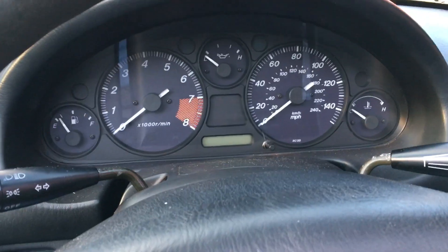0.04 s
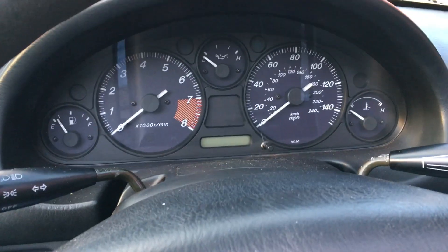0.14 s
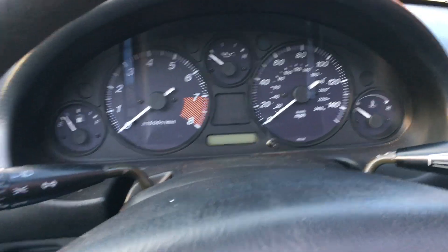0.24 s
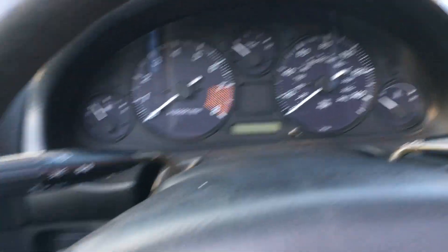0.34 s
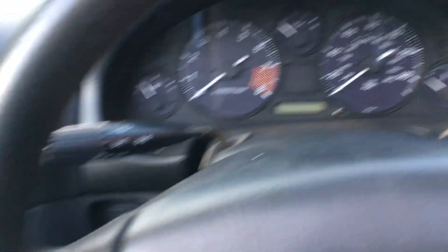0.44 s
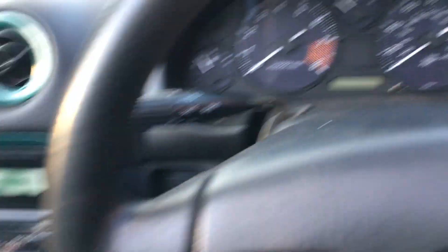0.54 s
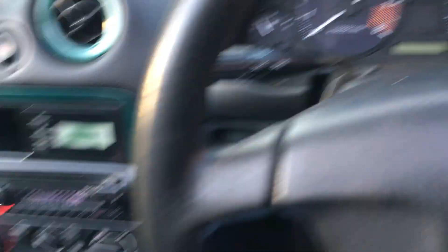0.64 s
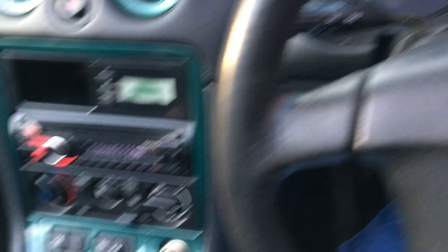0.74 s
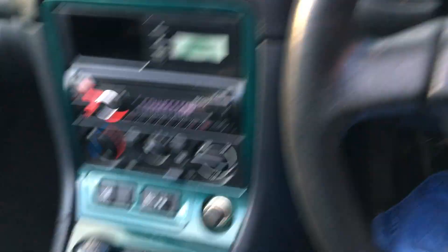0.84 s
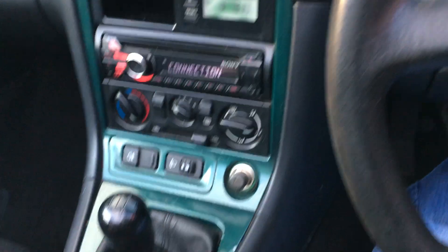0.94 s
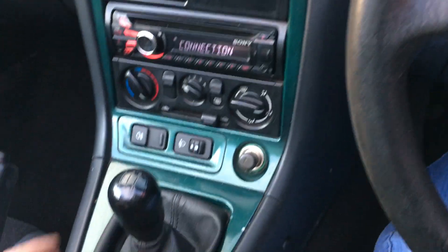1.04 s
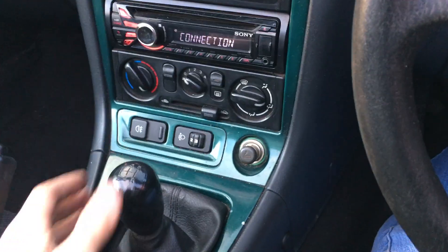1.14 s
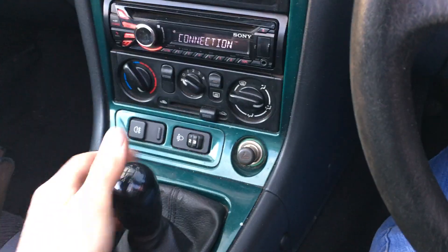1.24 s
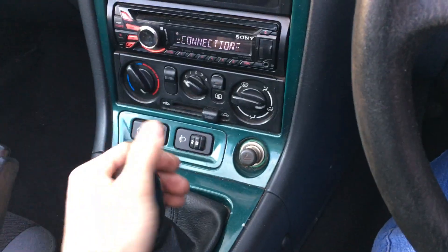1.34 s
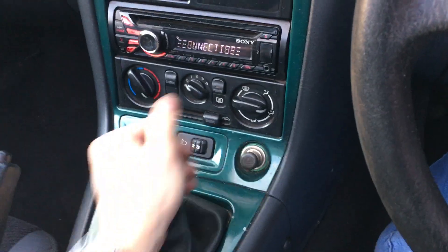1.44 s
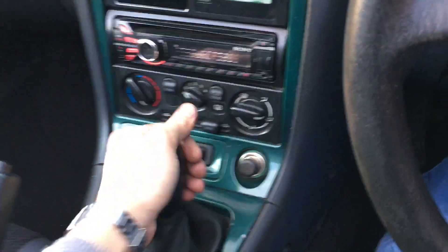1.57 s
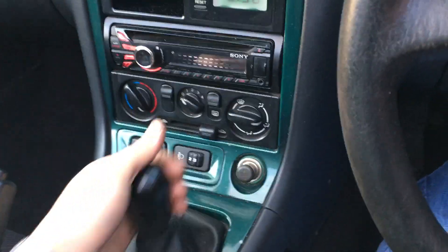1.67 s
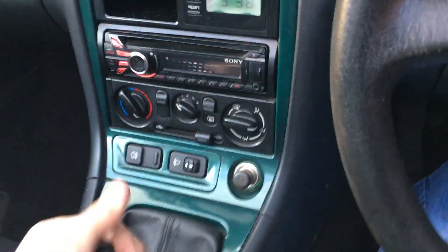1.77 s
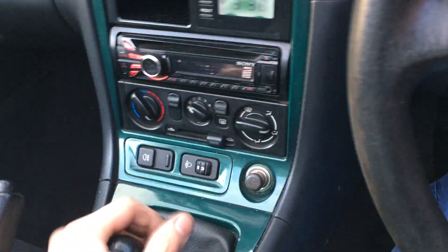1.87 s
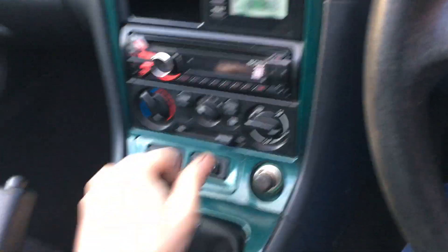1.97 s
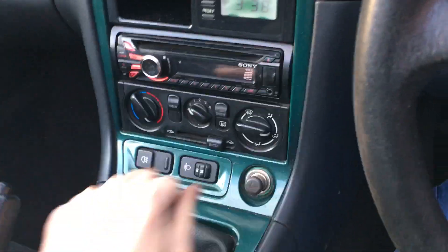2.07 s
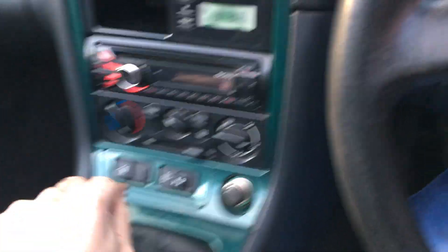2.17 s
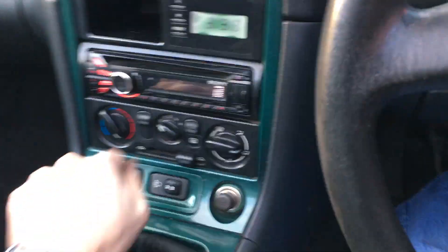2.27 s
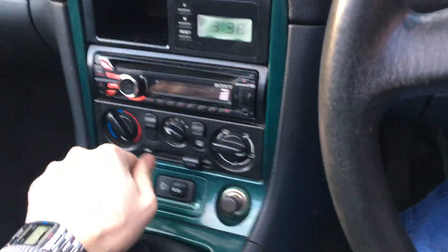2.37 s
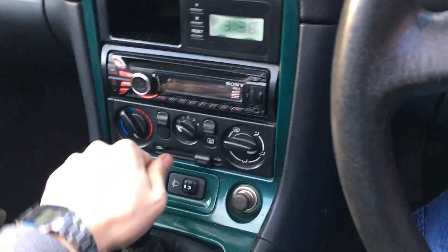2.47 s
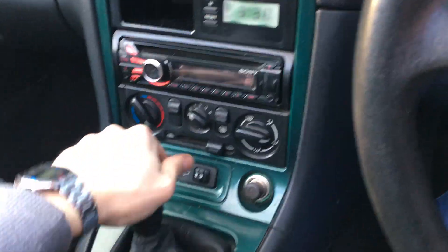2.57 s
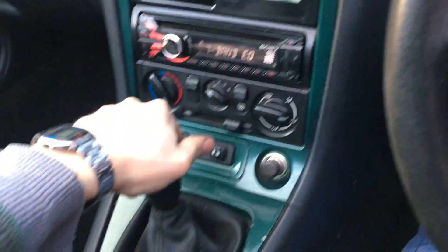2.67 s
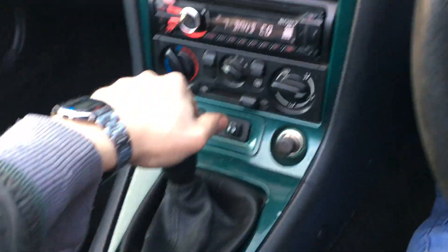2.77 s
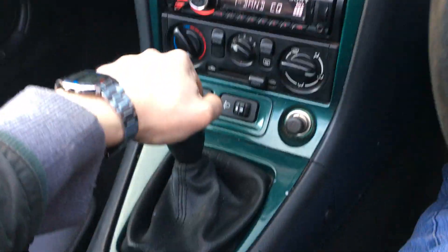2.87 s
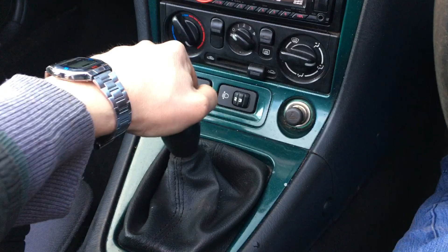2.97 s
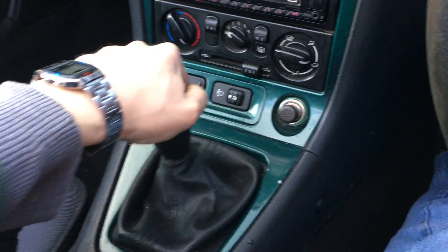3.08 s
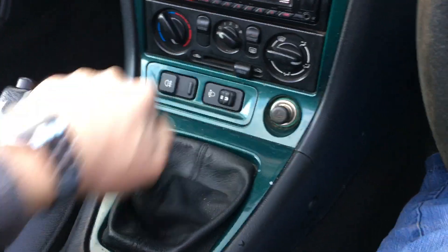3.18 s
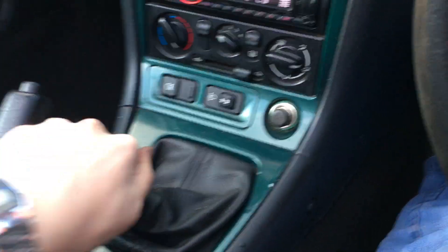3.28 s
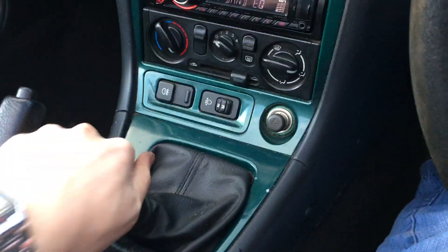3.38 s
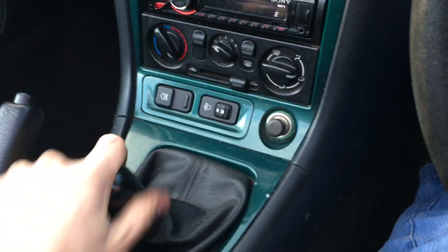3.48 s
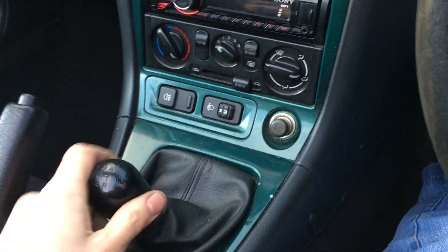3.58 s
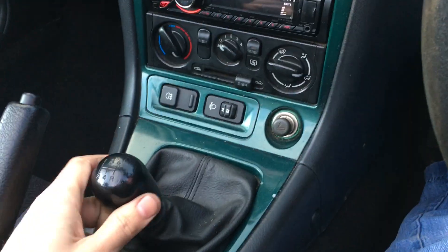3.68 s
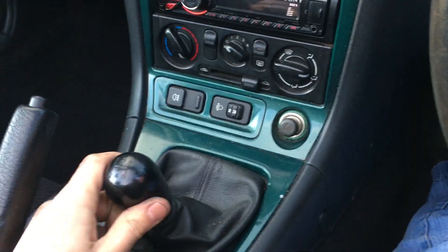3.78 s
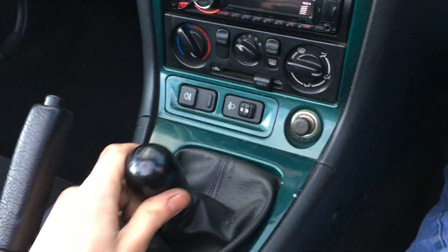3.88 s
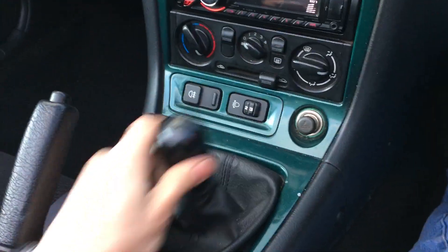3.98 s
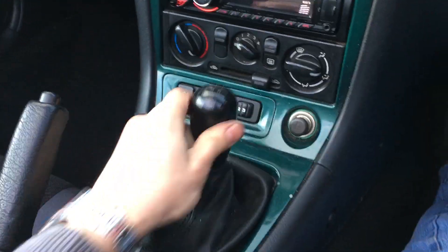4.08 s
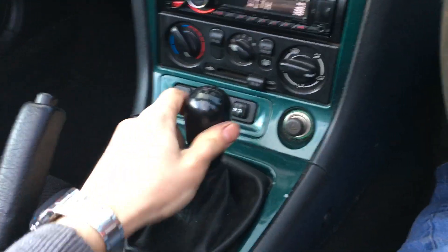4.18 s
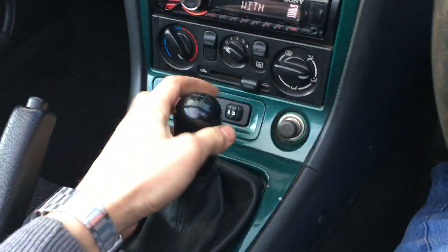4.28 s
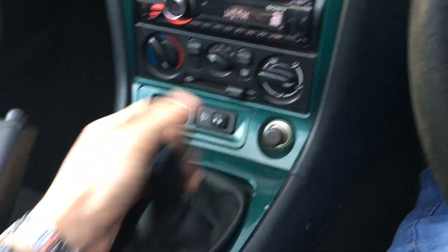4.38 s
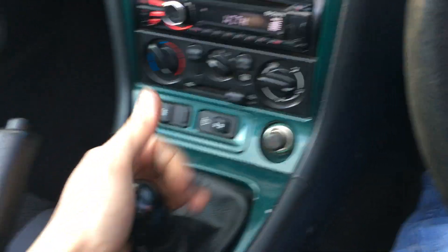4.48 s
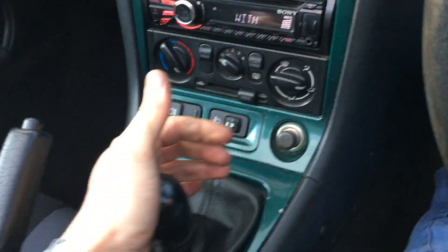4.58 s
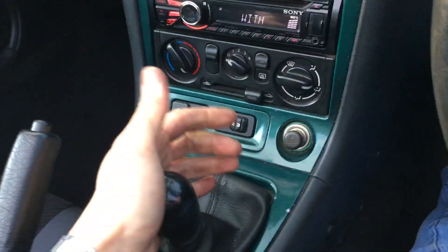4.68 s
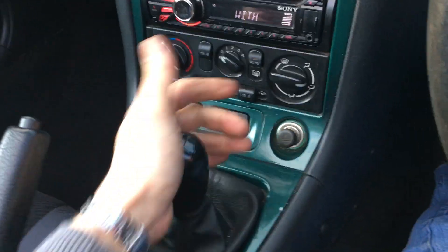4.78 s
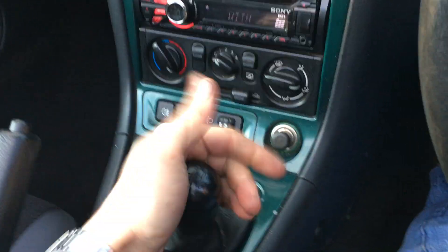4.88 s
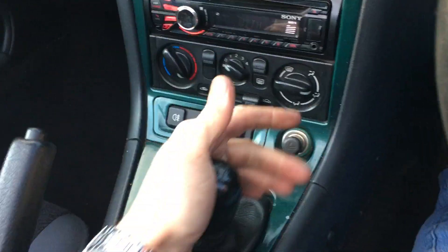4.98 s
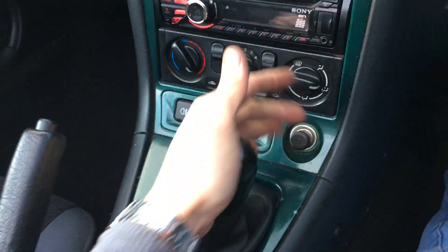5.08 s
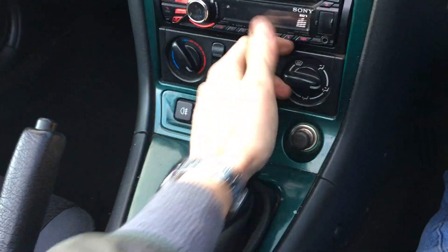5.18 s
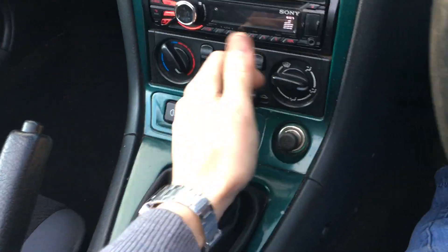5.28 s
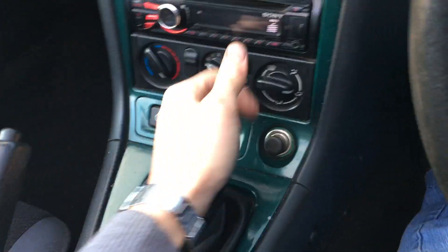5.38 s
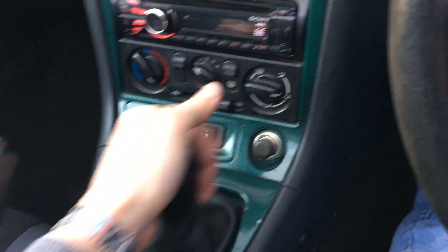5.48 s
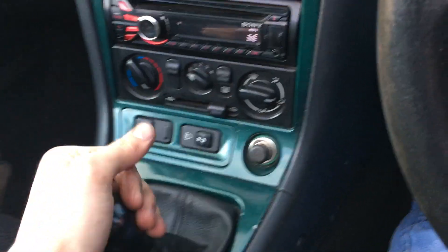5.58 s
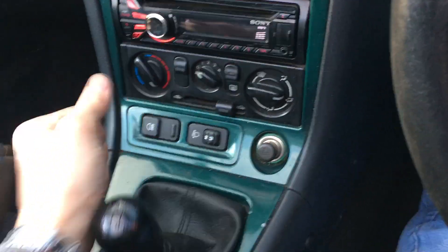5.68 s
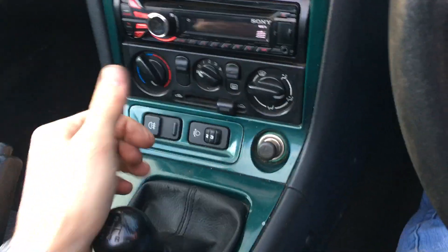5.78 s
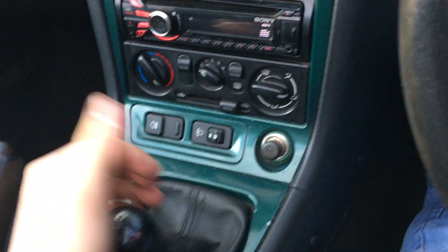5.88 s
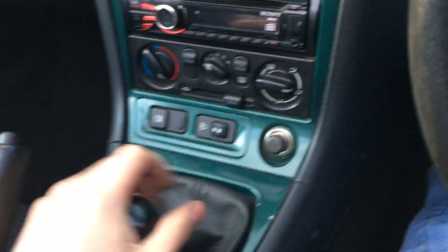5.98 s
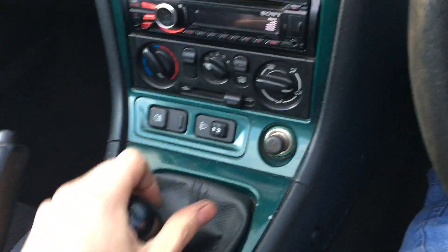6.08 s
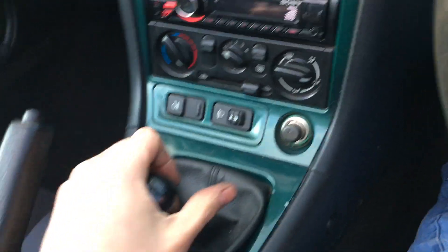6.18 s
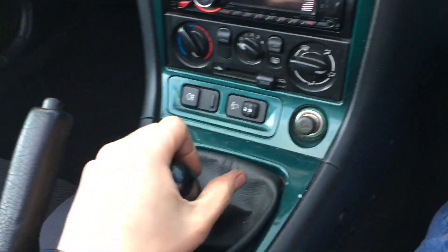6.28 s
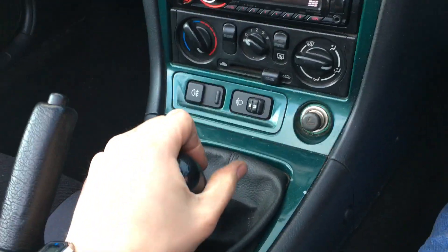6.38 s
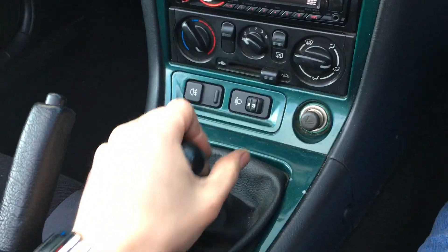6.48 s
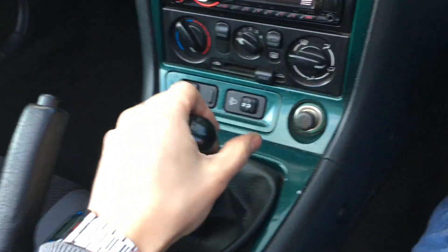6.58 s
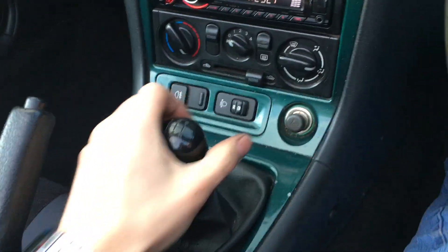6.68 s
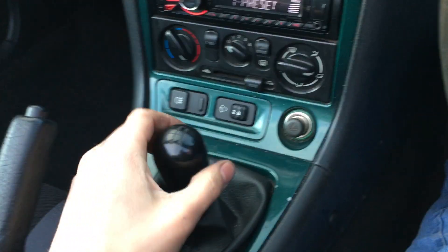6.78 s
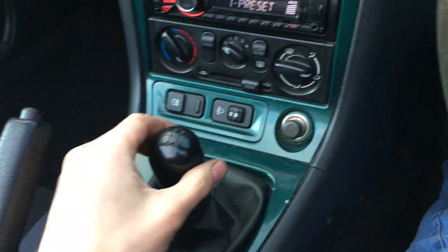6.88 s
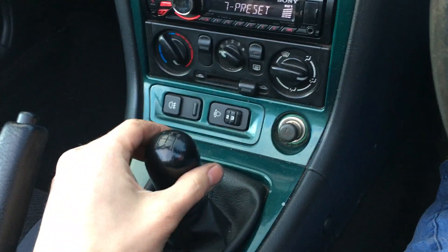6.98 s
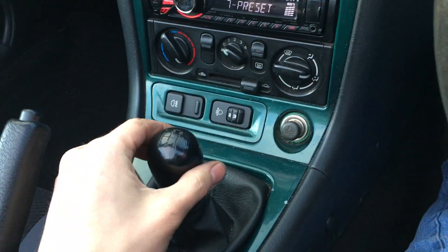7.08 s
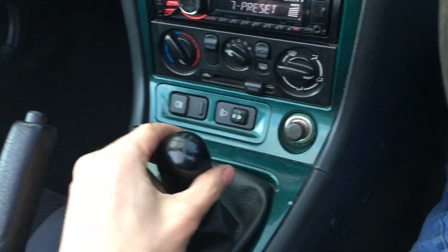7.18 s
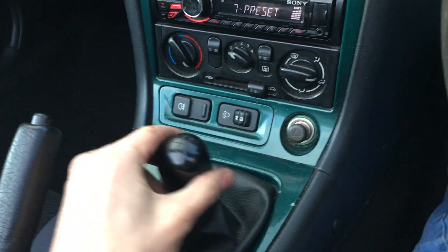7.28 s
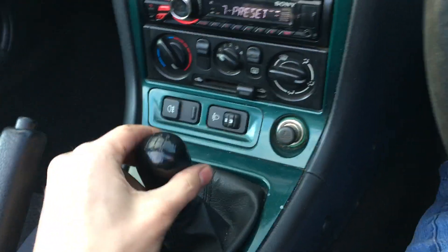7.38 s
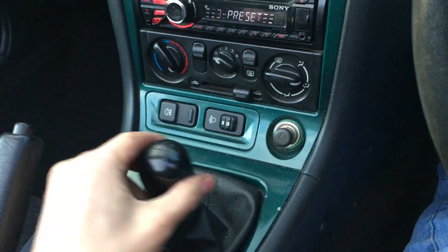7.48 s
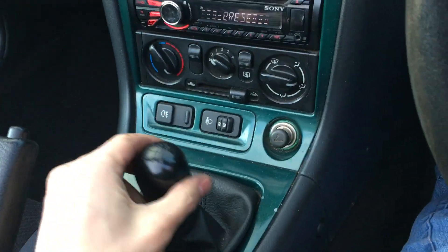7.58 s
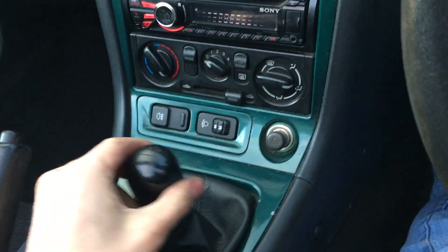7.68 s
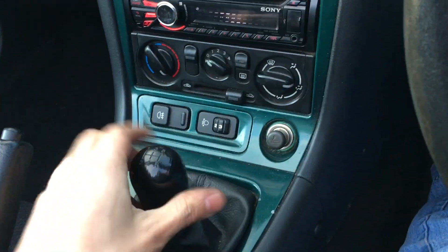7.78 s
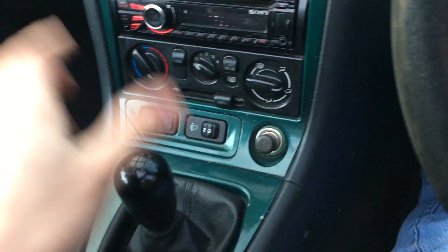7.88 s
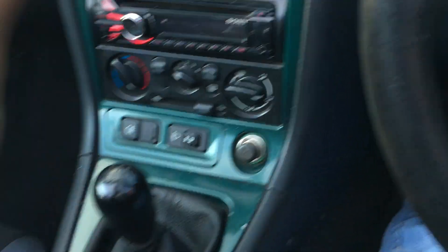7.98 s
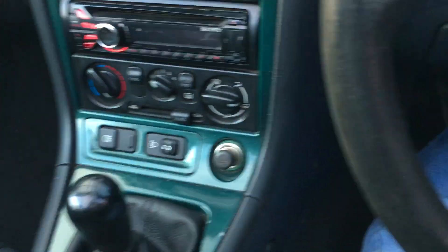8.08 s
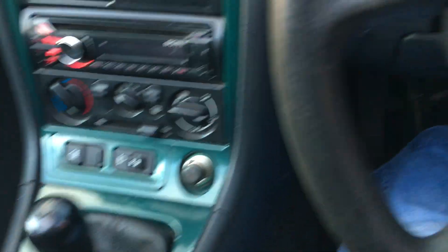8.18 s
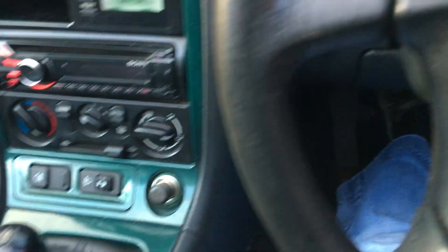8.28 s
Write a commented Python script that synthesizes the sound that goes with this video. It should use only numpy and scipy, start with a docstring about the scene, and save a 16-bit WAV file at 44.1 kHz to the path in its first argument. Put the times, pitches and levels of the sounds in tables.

```python
"""A hand works the manual gear lever of a small parked car, engine off, close to a mono microphone.
The lever knocks into its gates and shakes console and cabin, all built from dying sine modes.
Its linkage clicks (coloured noise snaps) and tinks (rod modes); a steel watch strap jingles (chains of
short modes). Sleeve and leather gaiter rustle as coloured friction noise, over a low outdoor rumble."""
import sys
import numpy as np
from scipy import signal
from scipy.io import wavfile
from scipy.ndimage import uniform_filter1d

SR = 44100
rng = np.random.default_rng(int(sys.argv[2]) if len(sys.argv) > 2 else 0)


def transcribe(signal):
    """Save signal, clipped to [-1, 1], as a 16-bit WAV file at the path in sys.argv[1]."""
    frames = np.atleast_2d(signal).T
    limited = np.clip(frames, -1, 1)
    pcm = np.round(limited * 32767).astype(np.int16)
    wavfile.write(sys.argv[1], SR, pcm)


N = 367747


# The lever meets a gate or stop. Each row: start in seconds, cabin boom in dB, console thud in dB,
# gate knock in dB (all before trims), tilt of the thud in dB per octave (higher is a harder blow).
CLUNKS = [(1.311, -62, -56, -60, 11), (1.529, -37, -39, -55, -9), (1.55, -33.5, -40, -53, -10),
          (1.569, -61, -50, -55, -1), (1.79, -40, -42, -50, 0), (1.829, -48, -44.5, -56, 8),
          (1.855, -41.5, -43.5, -60, 3), (2.036, -40, -34.5, -38, 7), (2.215, -47, -36.5, -60, -10),
          (2.246, -42, -40.5, -63, -7), (2.366, -43, -34.5, -46.5, -2.5), (2.97, -64, -59, -67, 8),
          (3.221, -55, -47, -51, 1), (3.268, -55, -42, -57, 15), (3.28, -41.5, -34.5, -40, 6.5),
          (4.044, -43, -40.5, -49.5, 7), (4.142, -40.5, -41, -61, 6), (4.178, -44, -49, -68, 1),
          (4.469, -37, -39, -52, -0.5), (4.497, -43, -43.5, -67, 4), (4.837, -45, -39, -47.5, -1),
          (4.943, -42.5, -45, -53, -7), (4.986, -68, -44.5, -65, 14), (5.209, -38, -36.5, -46, 5),
          (5.234, -34, -29, -46, 0), (5.265, -42, -42.5, -60, -3), (5.568, -49, -47, -62, 2),
          (5.612, -51, -47.5, -58, 3), (5.75, -44, -36.5, -58, -6), (5.801, -47, -41.5, -59, -5),
          (6.135, -56, -51.5, -73, -9), (6.62, -51, -45, -54.5, 14), (7.847, -49, -52, -64, 3.5),
          (8.059, -47, -52, -62, 16)]
# Resonances of the cabin air, console panels and gate, before each blow's random shift.
# Each row: frequency in Hz, relative level in dB, time to fall 60 dB in seconds.
CABIN = [(55.14, -14.5, 0.53), (69.5, -11.5, 0.28)]
PANELS = [(106, -10, 0.28), (156.5, 1, 0.12), (185, 3.5, 0.13), (204.2, -8.5, 0.32), (262, 2, 0.072),
          (322.4, 2.5, 0.068), (389.5, -0.5, 0.063)]
GATE = [(424, -15, 0.038), (617, -2.5, 0.038), (662, -6, 0.062), (860, 2, 0.011), (936, -18, 0.056)]


def clunks(boom_trim_db=-1, thud_trim_db=0, knock_trim_db=-1,
           boom_rise_s=0.013, thud_rise_s=0.0013, knock_rise_s=0.0015, pivot_hz=230):
    """Each blow rings gate, console panels and cabin air together; the heavy cabin air swells slowest."""
    out = np.zeros(N)
    t = np.arange(SR // 4) / SR
    for start, boom_db, thud_db, knock_db, tilt in CLUNKS:
        # a positive tilt favours the higher panel modes
        panels = [(hz, db + tilt * np.log2(hz / pivot_hz), t60) for hz, db, t60 in PANELS]
        knock = ring(GATE, t, detune=0.055) * (1 - np.exp(-t / knock_rise_s))
        add(out, start, gain_of(knock_db + knock_trim_db) * struck(knock))
        thud = ring(panels, t, detune=0.062) * (1 - np.exp(-t / thud_rise_s))
        add(out, start, gain_of(thud_db + thud_trim_db) * struck(thud))
        boom = ring(CABIN, t, detune=0.059) * (1 - np.exp(-t / boom_rise_s))
        add(out, start, gain_of(boom_db + boom_trim_db) * struck(boom))
    return out


# Hard clicks of the selector. Each row: start in seconds, body in dB, sharp edge in dB (before trims).
CLICKS = [(0.5, -79, -66), (1.55, -48, -63), (2.22, -42.5, -45.5), (2.368, -47.5, -53), (3.133, -70, -66),
          (3.2918, -42.5, -54), (3.367, -61.5, -57), (3.608, -59.5, -72), (3.6805, -58, -70),
          (3.7432, -55.5, -52), (3.8471, -55, -59.5), (4.2436, -64, -50.5), (4.9184, -45, -63),
          (5.2023, -41.5, -45.5), (5.2142, -45, -45), (5.2251, -39.5, -35.5), (5.2327, -36, -41),
          (5.249, -39.5, -44.5), (5.3454, -56, -50), (5.431, -70, -54.5), (5.5684, -56, -70),
          (5.749, -47.5, -67), (6.2452, -54.5, -50.5), (6.4516, -57.5, -63), (6.5632, -51, -63),
          (7.17, -61.5, -90), (7.211, -57, -56), (7.3494, -55.5, -79), (7.407, -48, -54.5),
          (7.589, -61.5, -83), (7.7135, -60, -64.5), (7.8234, -57, -80), (7.842, -50, -64),
          (7.8491, -48, -47.5), (7.9217, -49, -80)]
# Spectra of the click's body (also the rattling bush) and of its edge.
# Each row: frequency in Hz, relative density in dB per Hz.
CLICK_BODY = [(200, -9), (600, 5), (1150, 6.5), (1500, 6), (1950, 4), (2700, 1), (3600, -2), (5500, -16.5)]
CLICK_EDGE = [(2000, -9.5), (4000, 6.5), (6500, 7), (8000, 3), (12000, -1.5), (16000, -7)]


def clicks(body_trim_db=-2, edge_trim_db=-3, snap_s=0.0011, scatter_s=0.0058, scatter_db=-7, rise_s=0.00076):
    """A sharp snap of noise, scattered for a few milliseconds by the dashboard."""
    out = np.zeros(N)
    t = np.arange(SR // 10) / SR
    decay = np.exp(-t / snap_s) + gain_of(scatter_db) * np.exp(-t / scatter_s)
    shape = decay * (1 - np.exp(-t / rise_s))
    for start, body_db, edge_db in CLICKS:
        body, edge = rng.standard_normal((2, len(t))) * shape
        add(out, start, gain_of(body_db + body_trim_db) * struck(colour(body, CLICK_BODY)))
        add(out, start, gain_of(edge_db + edge_trim_db) * struck(colour(edge, CLICK_EDGE)))
    return out


# The steel shift rod rings briefly. Each row: start in seconds, rod peak in dB before the trim.
TINKS = [(1.531, -36), (1.551, -37), (1.787, -41.5), (1.853, -39.5), (2.048, -40.5), (2.398, -45),
         (3.2916, -29.5), (4.147, -40), (4.473, -36.5), (4.538, -48), (5.224, -26), (5.2503, -35),
         (6.128, -46.5), (7.229, -46), (7.372, -44.5), (7.497, -45.5), (7.559, -40.5), (7.659, -46),
         (7.772, -47.5)]
# Modes of the rod, before random shift.
# Each row: frequency in Hz, relative level in dB, time to fall 60 dB in seconds.
ROD = [(1720, 5.5, 0.037), (1920, 15.5, 0.013), (1956, 3.5, 0.052), (2240, -12, 0.017), (2460, -6, 0.035),
       (2970, -36, 0.018)]


def tinks(trim_db=-1, rise_s=0.00057, rattle_db=-7, rattle_s=0.0091):
    """Play in the linkage lets the greased rod ring briefly and rattle in its bush."""
    out = np.zeros(N)
    t = np.arange(SR // 10) / SR
    for start, db in TINKS:
        rod = peaked(ring(ROD, t, detune=0.025) * (1 - np.exp(-t / rise_s)))
        rattle = rng.standard_normal(len(t)) * np.exp(-t / rattle_s)
        bush = peaked(colour(rattle, CLICK_BODY))
        add(out, start, gain_of(db + trim_db) * (rod + gain_of(rattle_db) * bush))
    return out


# Links of the watch strap collide. Each row: start in seconds, peak of the chain in dB before the trim.
JINGLES = [(1.625, -23), (1.9996, -30), (2.2067, -30), (2.4083, -27.5), (4.18, -29), (4.2428, -42),
           (4.2901, -46), (4.5526, -37.5), (4.892, -24), (4.9626, -33), (4.9862, -33), (5.017, -34),
           (5.07, -36), (5.2753, -33), (5.597, -32.5), (5.7897, -29), (5.8207, -34.5), (6.1225, -44.5),
           (7.5916, -50), (7.633, -51.5), (7.6974, -53)]
# Modes of a steel link, before random shift.
# Each row: frequency in Hz, relative level in dB, time to fall 60 dB in seconds.
STRAP = [(4090, -17, 0.01), (6600, -1.5, 0.006), (8130, -6, 0.032), (9410, -2, 0.0085), (9220, -1, 0.017),
         (10030, -2.5, 0.013), (11230, 3, 0.0082), (12820, 2.5, 0.0045), (12800, -21.5, 0.0082),
         (14800, -9, 0.013), (14780, -2.5, .012)]


def jingles(trim_db=0, gap_s=0.0014, fade_db=4.0, count=6):
    """One steel link snaps against the next, each softer than the last, and the chain settles."""
    out = np.zeros(N)
    t = np.arange(SR // 25) / SR
    for start, db in JINGLES:
        chain = np.zeros(len(t))
        delays = np.cumsum(gap_s * rng.uniform(0.12, 2.1, count))
        for k, delay in enumerate(delays - delays[0]):
            link = ring(STRAP, t, detune=0.065, spread_db=11.5)
            add(chain, delay, gain_of(-fade_db * k) * link)
        add(out, start, gain_of(db + trim_db) * peaked(chain))
    return out


def cabin(x, t60=0.076, wet_db=-11):
    """Windscreen and trim return a short tail of sparse random echoes."""
    t = np.arange(SR // 4) / SR
    echoes = rng.standard_normal(len(t)) * (rng.random(len(t)) < 0.08)
    taps = echoes * (t > 0.003) * gain_of(-60 * t / t60)
    return x + gain_of(wet_db) * signal.fftconvolve(x, taps / np.linalg.norm(taps))[:N]


# Pushes and slides of the hand. Each row: start in seconds, end in seconds, cloth hiss in dB,
# scrape of gaiter and gate in dB (both before trims).
STROKES = [(0.694, 1.046, -68.5, -64.5), (1.072, 1.347, -59.5, -75), (1.517, 1.591, -53.5, -45),
           (1.725, 1.785, -61, -79), (1.781, 1.9, -56.5, -52), (1.963, 2.018, -54, -55),
           (2.02, 2.109, -56.5, -57), (2.168, 2.23, -55, -51), (2.302, 2.382, -58.5, -55.5),
           (2.374, 2.413, -54, -44.5), (3.22, 3.266, -53, -46), (3.276, 3.329, -51, -43),
           (3.49, 3.705, -65, -67), (3.985, 4.034, -55.5, -75), (4.038, 4.177, -50.5, -47.5),
           (4.2, 4.34, -71, -67), (4.407, 4.47, -62, -58), (4.46, 4.528, -54.5, -54),
           (4.607, 4.67, -52.5, -59), (4.802, 4.879, -49.5, -55.5), (4.922, 4.972, -49, -48.5),
           (5.201, 5.27, -51.5, -45.5), (5.274, 5.344, -59, -59), (5.482, 5.579, -61, -59),
           (5.579, 5.652, -51, -51.5), (5.702, 5.803, -56.5, -59), (5.826, 6.08, -58, -66),
           (6.568, 6.664, -52, -60.5), (6.715, 6.838, -71, -76), (7.842, 7.904, -64, -66)]
# Spectra of swishing cloth, scraping gaiter and gate, and the drumming console (also heard in shake).
# Each row: frequency in Hz, relative density in dB per Hz.
CLOTH = [(1060, -17), (1800, -8.5), (2080, -9), (2950, -10), (3480, -7), (4970, -11), (6130, -6.5),
         (7700, -12.5), (9160, -8), (10500, -13), (13300, -11.5), (15100, -17.5), (16000, -17)]
SCRAPE = [(250, -26), (450, -3), (650, -2), (800, -2), (1100, 0.5), (1450, -4), (1900, 1.5), (2200, -3.5),
          (2450, -2.5), (3000, -16.5), (4500, -18.5)]
CONSOLE = [(60, -34), (110, 4), (170, 3), (230, -4), (340, -2.5), (430, -10), (600, -23)]


def strokes(cloth_trim_db=0.5, scrape_trim_db=0, drum_db=-2, cloth_soft_s=0.015, scrape_soft_s=0.022):
    """Under a firm push cloth swishes, gaiter and gate stick and slip, and the console drums."""
    starts, ends, cloth_db, scrape_db = np.transpose(STROKES)
    rubs = patchy(friction(grains_per_s=750, grain_share=0.38, flutter_db=1.5), depth_db=2.5)
    hiss = evened(colour(rubs, CLOTH))
    slips = patchy(friction(grains_per_s=300, grain_share=0.88, flutter_db=2.5), depth_db=3.5)
    grind = evened(colour(slips, SCRAPE)) + gain_of(drum_db) * evened(colour(slips, CONSOLE))
    cloth_gain = slides(starts, ends, cloth_db + cloth_trim_db, cloth_soft_s)
    scrape_gain = slides(starts, ends, scrape_db + scrape_trim_db, scrape_soft_s)
    return hiss * cloth_gain + grind * scrape_gain


def slides(starts, ends, dbs, soft_s, size=64):
    """Gain over time of strokes whose pressure builds, holds and lets go."""
    t = np.arange(0, N, size)[:, None] / SR
    building = (1 + np.tanh((t - starts) / soft_s)) / 2
    letting_go = (1 + np.tanh((ends - t) / soft_s)) / 2
    return np.interp(np.arange(N) / SR, t[:, 0], (building * letting_go) @ gain_of(dbs))


# Spectra of the knitted sleeve and the leather gaiter.
# Each row: frequency in Hz, relative density in dB per Hz.
WOOL = [(1200, -2), (2000, 0.5), (2600, -4.5), (3400, -2), (5000, -6.5), (6500, -5.5), (9300, -8),
        (10500, -11.5), (12000, -7), (16000, -14.5)]
LEATHER = [(250, -32.5), (450, 0.5), (650, 2), (800, 0), (1100, 1.5), (1500, -5), (1950, -11), (2600, -9),
           (4000, -22.5)]


def sleeve(trim_db=0, rub_db=-4, follow_db=-10, follow_soft_s=0.072):
    """The knitted sleeve hisses and the leather gaiter folds as the arm moves, swelling around each stroke."""
    starts, ends, cloth_db, _ = np.transpose(STROKES)
    swells = slides(starts, ends, cloth_db + follow_db, follow_soft_s)
    motion = np.hypot(gain_of(arm_db() + trim_db), swells)
    fibres = patchy(friction(grains_per_s=700, grain_share=0.43, flutter_db=1), depth_db=2)
    wool = evened(colour(fibres, WOOL))
    leather = evened(colour(fibres[::-1], LEATHER))  # reversed, so the two do not move in step
    return motion * (wool + gain_of(rub_db) * leather)


# How briskly the arm moves. Each row: time in seconds, sleeve rustle in dB before trims and swells.
ARM = [(0, -75.5), (.35, -75.5), (.5, -71), (1.3, -57), (2.3, -62), (2.7, -68.5), (3.42, -69), (3.9, -67),
       (4.5, -63.5), (4.74, -69), (5.0, -60.5), (5.41, -66), (5.9, -59), (6.15, -71), (7.05, -76),
       (7.75, -69), (8.0, -68), (8.34, -63.5)]


def arm_db():
    """Briskness of the arm over time, gliding from point to point."""
    return np.interp(np.arange(N) / SR, *np.transpose(ARM))


def friction(grains_per_s, grain_share, flutter_db):
    """Fine sliding noise with small catches, under uneven pressure."""
    catches = rng.standard_normal(N) * (rng.random(N) < grains_per_s / SR)
    sliding = rng.standard_normal(N) + grain_share * evened(catches)
    return sliding * gain_of(flutter_db * wander(per_s=90))


def patchy(x, depth_db, frames=9, bins=5):
    """Folds come and go under the moving arm, so the colour of the rubbing keeps changing."""
    spectrum = signal.stft(x, nperseg=512)[2]
    folds = uniform_filter1d(rng.standard_normal(spectrum.shape), frames, axis=1)
    folds = evened(uniform_filter1d(folds, bins, axis=0))
    return evened(signal.istft(spectrum * gain_of(depth_db * folds))[1][:N])


def shake(rest_db=-65, drag_db=-4, clunk_db=-7, tink_db=-9):
    """The console drums softly at rest, more as the arm drags the lever, and after each clunk or tink."""
    drum = evened(colour(friction(grains_per_s=200, grain_share=0.22, flutter_db=3.0), CONSOLE))
    blows = [(start, thud_db + clunk_db) for start, _, thud_db, _, _ in CLUNKS]
    blows += [(start, db + tink_db) for start, db in TINKS]
    drag = gain_of(arm_db() + drag_db)
    return drum * np.sqrt(gain_of(rest_db) ** 2 + drag ** 2 + tremble(blows) ** 2)


def tremble(blows, rise_s=0.029, fade_s=0.059):
    """Gain of the shaking that blows (seconds, dB) leave behind: it builds up, then dies away."""
    power = np.zeros(N)
    t = np.arange(SR) / SR
    shape = (1 - np.exp(-t / rise_s)) * np.exp(-t / fade_s)
    for start, db in blows:
        add(power, start, (gain_of(db) * shape) ** 2)
    return np.sqrt(power)


# Spectrum of the outdoor noise. Each row: frequency in Hz, relative density in dB per Hz.
RUMBLE = [(18, -28.5), (30, -15.5), (42, -3.5), (58, 1), (80, -9.5), (120, -19), (250, -34), (400, -27.5),
          (600, -30), (1100, -27.5), (2200, -48.5), (5000, -58)]


def rumble(level_db=-57):
    """Outdoor noise booms faintly and steadily in the closed cabin."""
    return gain_of(level_db) * evened(colour(rng.standard_normal(N), RUMBLE))


def ring(modes, t, detune, spread_db=2):
    """Dying modes; each blow lands elsewhere, so it weights and detunes them anew."""
    hz, db, t60 = np.transpose(modes)[:, :, None]
    weight, shift, sign = rng.uniform(-1, 1, (3, len(modes), 1))
    waves = np.sign(sign) * np.sin(2 * np.pi * hz * (1 + detune * shift) * t)
    return (waves * gain_of(db + spread_db * weight - 60 * t / t60)).sum(0)


def colour(x, points, size=8192):
    """Causal minimum-phase filter through the given (Hz, dB) points."""
    hz, db = np.transpose(points)
    f = abs(np.fft.fftfreq(size, 1 / SR)) + 1
    # beyond the end points the response falls 24 dB per octave, down to a floor
    octaves_outside = np.maximum(np.log2(hz[0] / f), 0) + np.maximum(np.log2(f / hz[-1]), 0)
    shape_db = np.maximum(np.interp(np.log(f), np.log(hz), db) - 24 * octaves_outside, -90)
    # the Hilbert transform of the log gain gives the minimum phase
    response = np.exp(np.conj(signal.hilbert(np.log(gain_of(shape_db)))))
    taps = np.fft.ifft(response).real
    return signal.oaconvolve(x, taps[:size // 2])[:len(x)]


def wander(per_s, size=64):
    """Smooth chance of rms 1 that heads for a new random value per_s times a second."""
    knots = rng.standard_normal(N // size)
    return evened(np.interp(np.arange(N) * per_s / SR, np.arange(len(knots)), knots))


def gain_of(db):
    """Decibels to amplitude."""
    return 10 ** (np.asarray(db) / 20)


def evened(x):
    """Scales to rms 1."""
    return x / np.sqrt(np.mean(x ** 2) + 1e-20)


def peaked(x):
    """Scales to peak 1."""
    return x / (abs(x).max() + 1e-20)


def struck(x, size=882):
    """Scales a hit to rms 1 over its loudest 20 ms."""
    return x / np.sqrt(uniform_filter1d(x ** 2, size, mode="constant").max() + 1e-20)


def add(mix, start, sound):
    """Mixes a sound in at a start time in seconds, cut off at the end of the mix."""
    part = mix[max(round(start * SR), 0):][:len(sound)]
    part += sound[:len(part)]


def scene():
    """All sources at one microphone, the same in both channels."""
    bright_hits = cabin(clicks() + tinks() + jingles())
    mono = clunks() + bright_hits + strokes() + sleeve() + shake() + rumble()
    return np.array([mono, mono])


def record(dry, edge_hz=16050):
    """A steep low-pass limits the treble."""
    taps = signal.firwin(511, edge_hz, window=("kaiser", 9), fs=SR)
    return signal.oaconvolve(dry, taps[None], "same")


dry = scene()
out = record(dry)
transcribe(out)
```